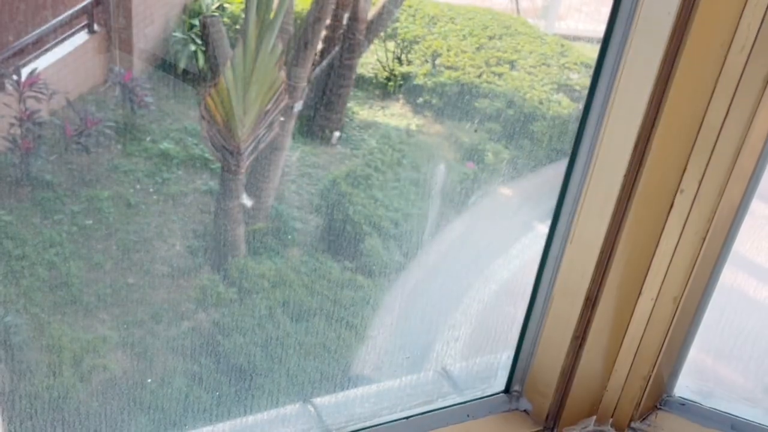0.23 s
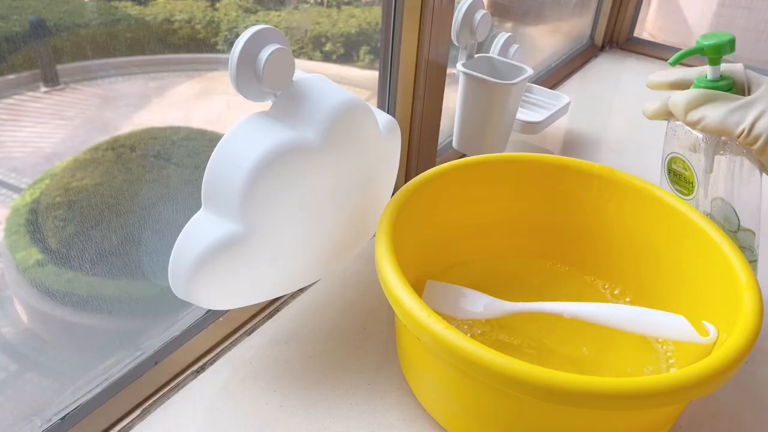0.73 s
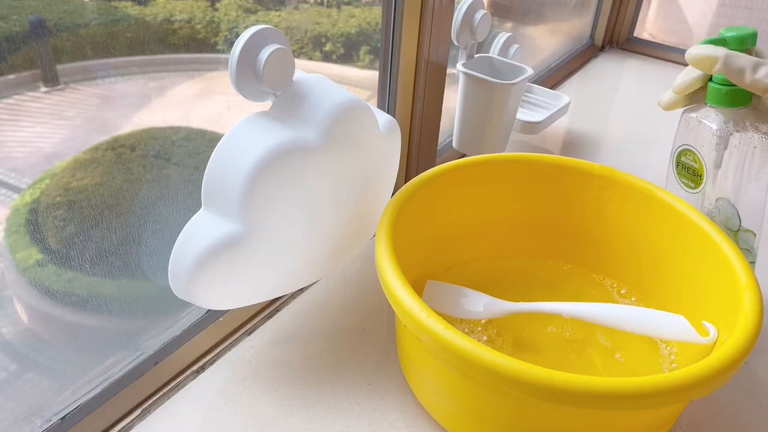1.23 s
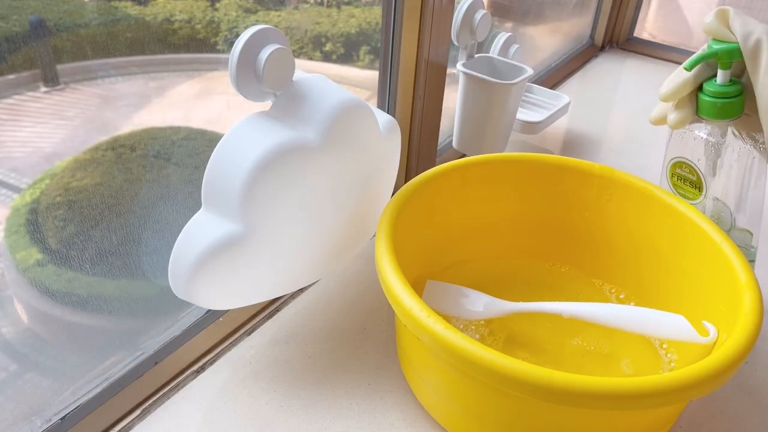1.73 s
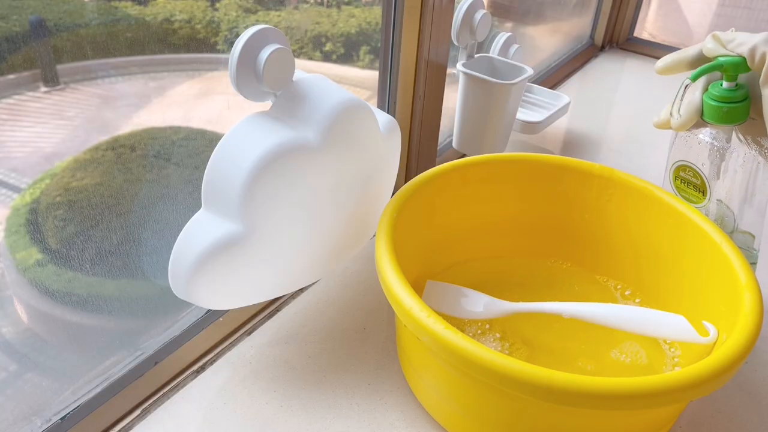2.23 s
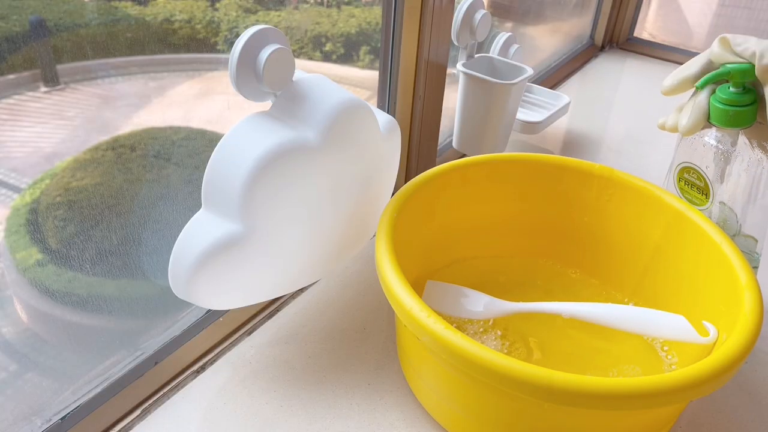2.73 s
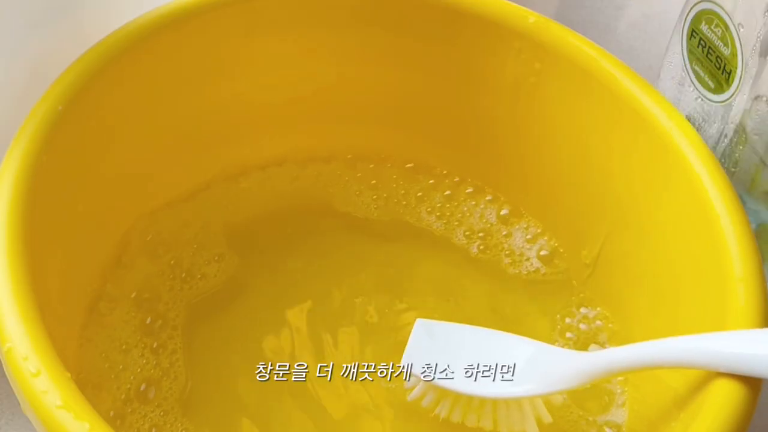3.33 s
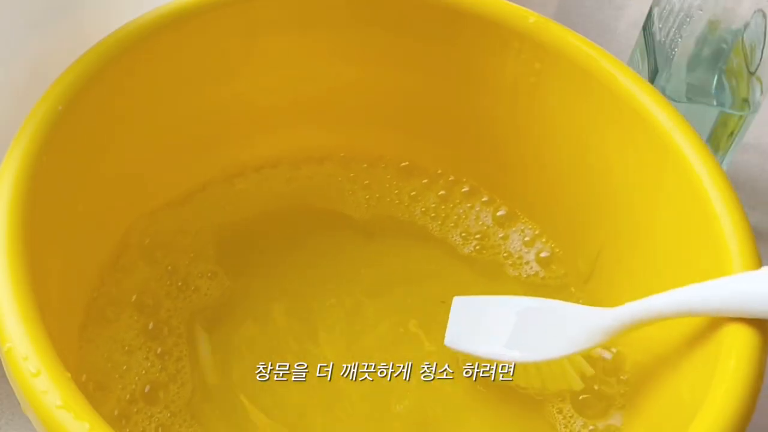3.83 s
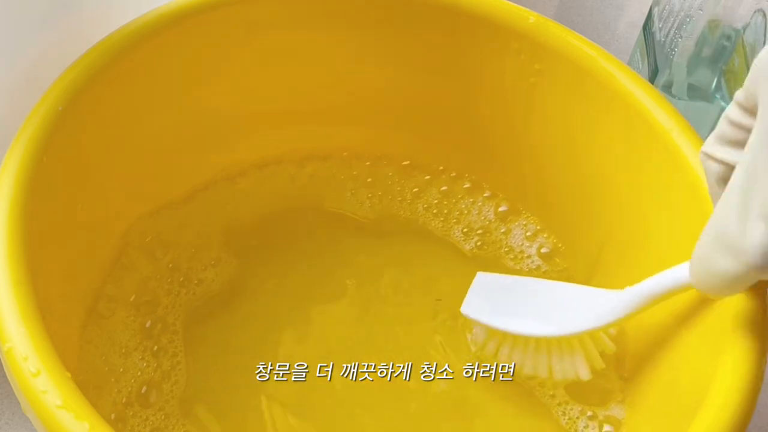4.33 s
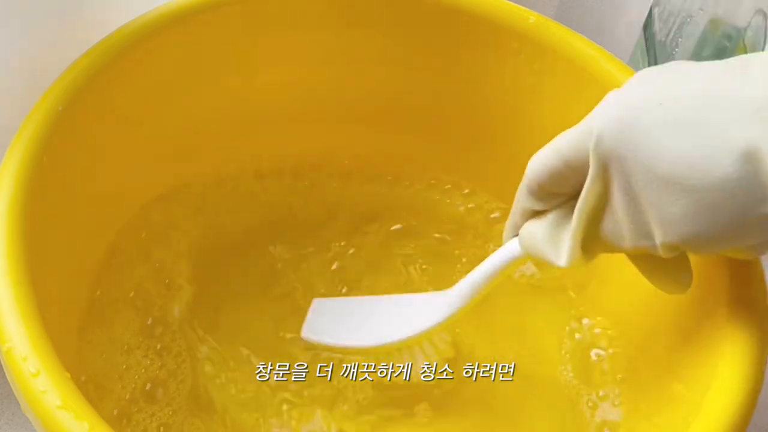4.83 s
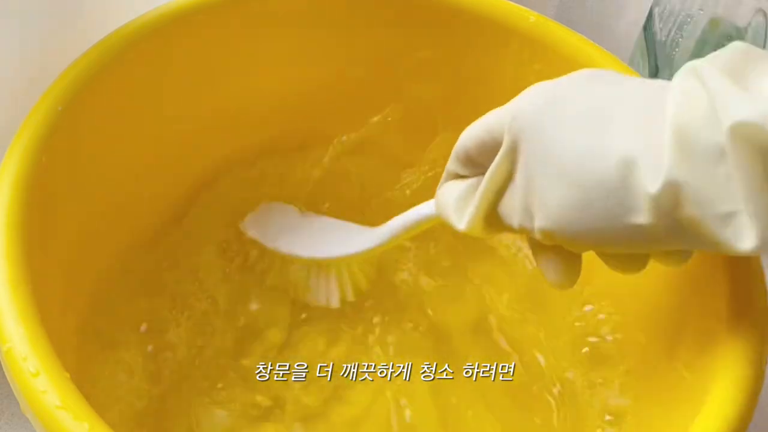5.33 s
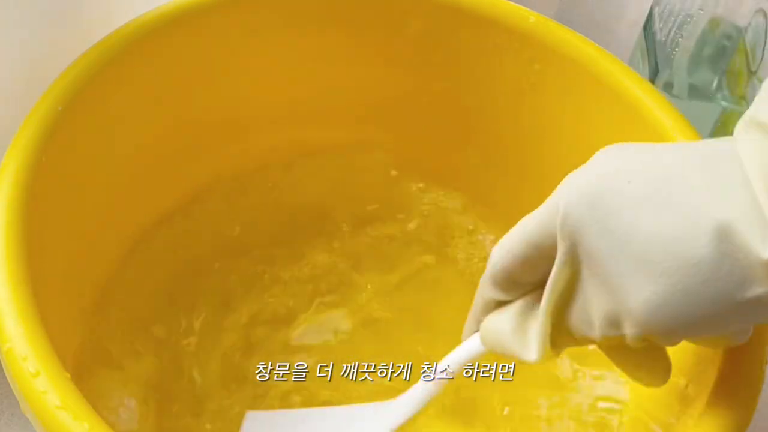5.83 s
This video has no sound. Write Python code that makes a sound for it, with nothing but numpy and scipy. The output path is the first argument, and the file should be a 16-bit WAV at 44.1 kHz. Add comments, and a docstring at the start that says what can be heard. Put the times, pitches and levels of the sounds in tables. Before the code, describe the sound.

Low humming room, one resonant double thud, bottle knocks and glove rustle, a short dull slide, then bubbly stirring and small splashes in a tub.

```python
"""A mains hum and low rumble fill a quiet room by a window, under the rustle of a gloved hand.
A window frame thuds shut in ringing modes; a pump bottle is worked, slid over the sill and set down, in
hollow knocks, clicks, rubs and resonant scraping. A brush is lifted and stirs soapy water in a plastic
basin, made of chirping bubbles and short pitched rings. Echoes die by frequency, and the two microphone
ports turn against each other in phase in the treble."""
import sys
import numpy as np
from scipy import signal
from scipy.fft import rfft, irfft, next_fast_len
from scipy.io import wavfile
from scipy.ndimage import uniform_filter1d, map_coordinates

SR = 44100
rng = np.random.default_rng(int(sys.argv[2]) if len(sys.argv) > 2 else 0)


def wav_record(signal):
    """Record a signal, one row per channel, as 16-bit PCM in the file named by sys.argv[1]."""
    frames = np.transpose(np.atleast_2d(signal))
    bounded = np.clip(frames, -1, 1)
    # unit amplitude maps onto the largest positive 16-bit level
    quanta = np.round(bounded * 32767).astype(np.int16)
    wavfile.write(sys.argv[1], SR, quanta)


N = 268083


def amp(db):
    """Decibels to linear gain."""
    return 10 ** (np.asarray(db) / 20)


def unit(x):
    """Scales a sound to rms 1."""
    return x / np.sqrt(np.mean(x ** 2) + 1e-20)


def along(points, hz):
    """Reads (frequency, value) points on a log frequency axis."""
    f, v = np.transpose(points)
    return np.interp(np.log(hz + 1), np.log(f + 1), v)


def curves(rows):
    """One gain per sample for each dB column, at -150 dB outside the rows."""
    s, *cols = np.transpose(rows)
    t = np.arange(N) / SR
    return [amp(np.interp(t, s, col, left=-150, right=-150)) for col in cols]


def ramp(start, length):
    """Climbs from 0 to 1 over length seconds."""
    return np.clip((np.arange(N) / SR - start) / length, 0, 1)


def wobble(rate):
    """A smooth random curve, rate knots a second."""
    knots = rng.standard_normal(int(N * rate / SR) + 4)
    return map_coordinates(knots, [np.arange(N) * rate / SR])


def filtered(x, response):
    """Multiplies the spectrum of x by a complex response of frequency."""
    m = next_fast_len(x.shape[-1] + SR // 4)
    return irfft(rfft(x, m) * response(np.fft.rfftfreq(m, 1 / SR)), m)[..., :x.shape[-1]]


def band(x, lo_hz, hi_hz):
    """Butterworth band-pass."""
    sos = signal.butter(2, [lo_hz, min(hi_hz, SR / 2.2)], "band", fs=SR, output="sos")
    return signal.sosfilt(sos, x)


def add(track, s, sound):
    """Mixes a sound in at s seconds."""
    part = track[round(s * SR):][:len(sound)]
    part += sound[:len(part)]


def ring(hz, t60, attack, rise=0):
    """A damped sine; its pitch climbs by twice the share rise over its t60."""
    t = np.arange(int(SR * t60) + 8) / SR
    wave = np.sin(2 * np.pi * hz * t * (1 + rise * t / t60))
    return wave * amp(-60 * t / t60) * (1 - np.exp(-t / attack))


def bubbles(count, centre_hz, spread, cycles, size_db):
    """Random climbing chirps, summed to rms 1; a few bubbles are much larger than the rest."""
    at, size = rng.random(count), rng.exponential(size_db, count)
    pitch = rng.standard_normal(count)
    hz = np.clip(centre_hz * np.exp(spread * pitch), 150, 15000)[:, None]
    k = np.arange(int(3 * cycles * SR / centre_hz))
    u = k / SR * hz / cycles  # each bubble's own time
    chirp = np.sin(2 * np.pi * cycles * u * (1 + 0.197 * u))
    wave = amp(np.minimum(size, 3 * size_db))[:, None] * chirp * u * np.exp(-3.5 * u)
    start = (N * at).astype(int)[:, None]
    return unit(np.bincount((start + k).ravel(), wave.ravel(), minlength=N)[:N])


# Likeness of left and right in diffuse sound: (frequency [Hz], correlation)
LIKENESS = [(60, 0.98), (250, 0.86), (550, 0.36), (900, 0.19), (1600, 0.27), (2800, 0.55), (4500, 0.095),
            (6200, 0.73), (7300, 0.09), (8600, 1), (12000, 0.93)]


def paired(two):
    """Mixes two unrelated signals to a left and right with the room's likeness."""
    def mid_side(hz):
        turn = np.arccos(np.clip(along(LIKENESS, hz), -1, 1)) / 2
        return np.array([np.cos(turn), np.sin(turn)])

    mid, side = filtered(two, mid_side)
    return np.array([mid + side, mid - side])


def rush(spectrum, patchy_db):
    """Coloured stereo noise of rms 1 with patches of random gain in time and frequency."""
    z = signal.stft(rng.standard_normal((2, N)), nperseg=512)[2]
    field = uniform_filter1d(rng.standard_normal(z.shape[1:]), 6, 0)
    field = uniform_filter1d(field, 8, 1)
    two = signal.istft(z * amp(patchy_db * unit(field)), nperseg=512)[1][:, :N]
    return unit(paired(filtered(two, lambda hz: amp(along(spectrum, hz)))))


# Colour of the low rumble: (frequency [Hz], relative level [dB])
RUMBLE_COLOUR = [(20, -28), (45, -44), (60, -6.5), (78, 1), (95, -9), (120, -7), (150, -15.5), (220, -27.5),
                 (300, -67)]
# Colour of the dull room murmur: (frequency [Hz], relative level [dB])
MURMUR_COLOUR = [(100, -3), (200, 1), (600, -5.5), (1400, -19), (3000, -39), (4500, -39), (9000, -49),
                 (16000, -99)]
# Background swells: (time [s], room murmur level [dB], deep drone level [dB])
BACKGROUND_LEVELS = [(0, -49, -42), (.6, -54, -64), (1, -53.5, -68), (2.8, -53.5, -57), (3.3, -53, -53),
                     (4.6, -53, -58), (5.3, -52, -50), (6.08, -54, -64)]
MAINS_HZ, MOTOR_HZ = 100.6, 78.4
# Hum and rumble share a base level, lower by the early cut until they swell between two times
LOW_DB, LOW_EARLY_DB, LOW_SWELL_S = -36.5, -6.5, (0.15, 0.37)


def air():
    """A steady mains tone and an unsteady motor tone stand on wavering rumble, a deep drone and a murmur."""
    def tone(hz, waver_hz):
        return np.sin(2 * np.pi * np.cumsum(hz + waver_hz * wobble(2.854)) / SR)

    swell_start, swell_end = LOW_SWELL_S
    low = amp(LOW_DB + LOW_EARLY_DB * (1 - ramp(swell_start, swell_end - swell_start)))
    mains = amp(1.5 + 0.072 * wobble(4.5)) * tone(MAINS_HZ, waver_hz=0.27)
    motor = amp(-8.5) * amp(2.5 * wobble(5)) * tone(MOTOR_HZ, waver_hz=1.46)
    rumble = amp(-4) * rush(RUMBLE_COLOUR, patchy_db=1.5)
    murmur, deep = curves(BACKGROUND_LEVELS)
    drone_colour = [(15, -18), (30, -18), (48, 28), (60, -18), (90, -80)]  # Hz, dB
    drone = deep * amp(-1 * wobble(2.86)) * rush(drone_colour, patchy_db=-3.0)
    return drone + low * (mains + motor + rumble) + murmur * rush(MURMUR_COLOUR, patchy_db=2.5)


# Glove, foam and water in motion: (time [s], fizz level [dB], swish level [dB])
RUSTLE_LEVELS = [(0, -64.5, -58.5), (.27, -74, -63), (.49, -105, -69), (.6, -70, -62.5), (.8, -62.5, -63),
                 (.89, -59, -66), (1, -69, -66.5), (1.13, -62.5, -62.5), (1.3, -65, -60.5),
                 (1.39, -78.5, -65.5), (1.55, -59.5, -65.5), (1.64, -76, -69), (1.76, -65, -65),
                 (1.9, -93, -71), (2.05, -71, -66.5), (2.56, -100, -69), (2.71, -65, -65),
                 (2.96, -66.5, -63), (3.17, -55.5, -58.5), (3.35, -73.5, -64.5), (3.67, -61, -68),
                 (4.1, -67, -57), (4.42, -64, -62.5), (4.64, -59, -59.5), (5.1, -54.5, -62),
                 (5.5, -52, -55), (5.62, -59, -51.5), (5.76, -49.5, -66), (5.97, -58, -58.5),
                 (6.08, -53.5, -60)]
# Colour of the bright fizz: (frequency [Hz], relative level [dB])
FIZZ_COLOUR = [(1500, -11), (3500, 4), (6000, -4), (8800, 2), (11500, 2.5), (16000, -3.5)]
# Colour of the softer swish: (frequency [Hz], relative level [dB])
SWISH_COLOUR = [(300, -100), (900, 5.5), (2000, 3.5), (3300, -1.5), (4500, -9.5), (8000, -19.5)]


def rustle():
    """Rubber glove and foam: fizz and swish noises share one flicker."""
    flicker = wobble(35)
    fizz_gain, swish_gain = curves(RUSTLE_LEVELS)
    fizz = amp(0.91 * flicker) * rush(FIZZ_COLOUR, patchy_db=3.5)
    swish = amp(1.8 * flicker) * rush(SWISH_COLOUR, patchy_db=1.3)
    return fizz_gain * fizz + swish_gain * swish


# Faint fuzzy tones from afar: (start [s], end [s], pitch [Hz], level [dB])
FAR_TONES = [(0.02, 0.27, 2790, -67), (0.272, 0.466, 2880, -66), (1.26, 1.4, 3220, -64.5),
             (1.29, 1.46, 3000, -68), (1.317, 1.433, 3700, -66), (1.478, 1.66, 4750, -72),
             (1.685, 1.847, 3560, -65), (1.737, 1.84, 2770, -67), (1.844, 1.956, 2830, -69),
             (1.875, 2.057, 3070, -64), (2.09, 2.2, 3080, -71), (2.172, 2.29, 3100, -71),
             (2.27, 2.42, 3130, -74)]


def whistles():
    """Slow noise times a sine makes a narrow band that swells and fades."""
    out = np.zeros(N)
    for start, end, hz, db in FAR_TONES:
        t = np.arange(round((end - start) * SR)) / SR
        fuzz = unit(uniform_filter1d(rng.standard_normal(SR), 220))[:len(t)]
        swell = np.sin(np.pi * t / (end - start)) ** .5
        add(out, start, amp(db) * swell * fuzz * np.sin(2 * np.pi * hz * t))
    return out


# Knocks on hollow plastic: (time [s], level [dB], pitch [Hz])
HOLLOW_KNOCKS = [(.265, -38.5, 199.6), (1.322, -31, 277), (2.001, -26, 333), (2.651, -45.5, 336),
                 (3.2007, -22, 266.3), (3.492, -37.5, 315), (3.523, -39, 328), (3.549, -40.5, 473),
                 (3.637, -28, 347), (3.642, -35.5, 449), (3.675, -36.5, 297), (4.096, -34, 193),
                 (4.964, -38.5, 188), (5.273, -35.5, 246), (5.358, -43, 222), (5.427, -39, 237),
                 (5.607, -34, 221), (5.661, -35, 260), (5.775, -43.5, 255), (5.822, -37, 224)]
# Modes of each knock, before the underwater shortening: (pitch ratio, relative level [dB], t60 [s], attack [s])
HOLLOW_MODES = [(1, 3, 0.14, 0.004), (0.8, -13, 0.14, 0.007), (1.77, -9, 0.05, 0.002)]
KNOCK_PUFF_DB, KNOCK_PUFF_T60_S = -5, 0.08
GLUG_SHORTER = 0.66  # factor on the decay of knocks under water


def knocks():
    """Each knock has a hollow note, a lower neighbour, a short overtone and a dull puff of noise."""
    out, puffs = np.zeros((2, N))
    t = np.arange(SR // 8) / SR
    for s, db, hz in HOLLOW_KNOCKS:
        shorter = GLUG_SHORTER if s > STIR_LEVELS[0][0] else 1
        for ratio, mode_db, t60, attack in HOLLOW_MODES:
            add(out, s, amp(db + mode_db) * ring(ratio * hz, t60 * shorter, attack))
        decay = amp(db + KNOCK_PUFF_DB - 60 * t / KNOCK_PUFF_T60_S)
        add(puffs, s, decay * rng.standard_normal(len(t)))
    return out + band(band(puffs, 280, 880), 280, 880)


# Dull, middle and bright bands of a burst: (low edge [Hz], high edge [Hz], gain on white noise [dB])
BURST_SPLIT = [(455, 1700, 8.5), (1570, 5570, 5), (7910, 17800, 7)]


def foam():
    """Large, middling and tiny bubbles, each as strong as white noise is in its band."""
    large = bubbles(count=1500, centre_hz=1050, spread=0.311, cycles=6.3, size_db=4.5)
    middling = bubbles(count=4000, centre_hz=3000, spread=0.305, cycles=9.0, size_db=3.5)
    tiny = bubbles(count=9000, centre_hz=10260, spread=0.312, cycles=13.0, size_db=10.0)
    share = [[2 * (hi - lo) / SR] for lo, hi, _ in BURST_SPLIT]
    return np.array([large, middling, tiny]) * np.sqrt(share)


def bursts(rows, head, attack, t60, crack, grain_db, stagger=0):
    """Three band envelopes, tilted row by row; crack is the share of a very short start.
    A row's level is the rms of its first head seconds; bands may start up to stagger seconds late."""
    parts, t = np.zeros((3, N)), np.arange(SR // 5) / SR
    decay = crack * amp(-60 * t / 0.0085) + amp(-60 * t / t60)
    shape = decay * (1 - np.exp(-t / attack)) ** 2
    shape = shape / np.sqrt(np.mean(shape[:round(head * SR)] ** 2))
    for s, db, tilt_db in rows:
        for part, level in zip(parts, (db - tilt_db, db, db + tilt_db)):
            # overlapping bursts add in power
            add(part, s - attack + stagger * rng.random(), (amp(level) * shape) ** 2)
    return np.sqrt(parts) * amp(grain_db * wobble(260))


# Sharp clicks, contacts and bursting drops, before band gains: (time [s], level [dB], bright over middle [dB])
SHARP_CLICKS = [(0.2889, -58.5, -8), (0.4581, -36, -6.5), (0.7083, -48, -2), (1.321, -63.5, -15),
                (1.995, -39.5, -2), (2.1, -73, 11), (2.157, -69.5, 6), (2.265, -76, 12), (2.4441, -58, 1),
                (2.4525, -53, 2.5), (2.646, -63.5, -14), (2.6646, -71.5, 12), (2.743, -77, 18),
                (2.7765, -46, 1.5), (2.792, -63, -10), (2.8457, -51, 3), (2.922, -56, -3),
                (2.9388, -55, -5), (3.1267, -49.5, 2), (3.164, -51, 5), (3.1885, -69, 4), (3.2145, -67, 8),
                (3.227, -64, -8), (3.232, -55.5, -9), (3.274, -58, -3), (3.305, -59.5, 0),
                (3.636, -58, -17), (3.8391, -44.5, -0.5), (4.222, -80, -24), (4.3, -76, -32),
                (4.366, -58, -13), (4.3825, -54, -15.5), (4.5873, -45, -5.5), (5.242, -64, 17.5),
                (5.3028, -50.5, 10.5), (5.3177, -44, 0.5), (5.6426, -40, 0.5), (5.781, -44, 5.5),
                (5.858, -52, 4), (5.904, -51, 6), (6.054, -48, 6.5)]
# Soft rubs and splashes, before band gains: (time [s], level [dB], bright over middle [dB])
SOFT_PUFFS = [(0.481, -53.5, -14), (0.6619, -62, -4.5), (1.113, -65, 2), (1.4913, -70, 1), (1.552, -68, -4),
              (1.7344, -67.5, 0), (2.9706, -66, -7), (3.13, -57, -2), (3.1524, -51.5, -1.5),
              (3.817, -64, -8), (3.9836, -68.5, 5), (4.0231, -62.5, -10.5), (4.529, -65.5, 4),
              (4.827, -63.5, 5.5), (4.8872, -72, -11), (4.9586, -55, -3), (4.9989, -51.5, -5.5),
              (5.086, -75, 11), (5.1595, -53, 1.5), (5.1772, -51, -2), (5.1964, -55, 11.5),
              (5.3764, -74, 0.3), (5.4355, -62, 3), (5.474, -61, 3), (5.486, -53, 4), (5.5152, -50.5, -0.5),
              (5.535, -55, 2), (5.5587, -61, 4), (5.6904, -63.5, 19), (5.7168, -70, 3), (5.7478, -57, 15.5)]
DROP_ATTACK_S, DROP_STAGGER_S = .0018, .0045
GRAINY = .85  # power share of bubbles in the soft bursts; the rest is noise


def clicks_and_splashes():
    """Dry clicks start sharply, drops in stirred water slower and ragged; puffs swell in, full of bubbles."""
    wet_from_s = STIR_LEVELS[1][0]
    dry_rows = [row for row in SHARP_CLICKS if row[0] <= wet_from_s]
    wet_rows = [row for row in SHARP_CLICKS if row[0] > wet_from_s]
    clicks = bursts(dry_rows, head=0.0052, attack=0.00082, t60=0.043, crack=5.9, grain_db=0.9)
    drops = bursts(wet_rows, head=0.0039, attack=DROP_ATTACK_S, t60=0.019, crack=0.95, grain_db=2.5,
                   stagger=DROP_STAGGER_S)
    puffs = bursts(SOFT_PUFFS, head=0.021, attack=0.009, t60=0.085, crack=0, grain_db=3,
                   stagger=2 * DROP_STAGGER_S)
    noise = rng.standard_normal((3, 3, N))
    grains = np.sqrt(GRAINY) * foam() + np.sqrt(1 - GRAINY) * noise[2]
    mix = clicks * noise[0] + drops * noise[1] + puffs * grains
    return sum(amp(db) * band(part, lo, hi) for part, (lo, hi, db) in zip(mix, BURST_SPLIT))


# Breathy rubs and sloshes: (time [s], length [s], level [dB], centre pitch [Hz])
BREATHY_RUBS = [(1.989, 0.042, -43, 950), (4.583, 0.028, -57, 1890), (4.954, 0.022, -52.5, 3300),
                (5.004, 0.04, -60, 2800), (0.411, 0.061, -55, 3000), (4.43, 0.078, -56, 1140),
                (4.685, 0.045, -58, 950), (4.66, 0.04, -69, 1900), (5.167, 0.026, -49, 650),
                (5.66, 0.036, -52, 1200), (1.144, 0.034, -53.5, 1750), (1.174, 0.013, -55, 1840),
                (1.206, 0.015, -51.5, 1020), (1.219, 0.044, -51.5, 1230), (1.238, 0.0079, -54, 1180),
                (1.323, 0.04, -67, 1390), (3.115, 0.024, -53, 1900), (3.16, 0.02, -52, 1890),
                (3.708, 0.018, -55, 2240), (3.761, 0.046, -49.5, 1440), (3.809, 0.033, -47.5, 1490),
                (3.812, 0.0099, -49, 8200), (4.423, 0.085, -53, 1800), (4.583, 0.063, -52, 1300),
                (4.662, 0.044, -54, 1090), (4.812, 0.054, -50.5, 3180), (4.604, 0.029, -55, 686),
                (4.595, 0.059, -75, 2300), (5.37, 0.022, -51, 3000), (5.512, 0.026, -49.5, 3200)]
RUB_WIDTH = 1.4  # ratio of the band edges to the pitch, over and under


def rubs():
    """Each rub is a swell of noise round its own pitch."""
    out = np.zeros(N)
    for s, length, db, hz in BREATHY_RUBS:
        noise = unit(band(rng.standard_normal(SR // 8), hz / RUB_WIDTH, hz * RUB_WIDTH))
        noise = noise[-round(length * SR):]
        add(out, s, amp(db) * np.hanning(len(noise)) * noise)
    return out


# Blow and rebound of the window: (time [s], level [dB])
BLOWS = [(.462, -10.5), (.4936, -17)]
# Modes of the window frame: (frequency [Hz], relative level [dB], t60 [s])
FRAME_MODES = [(68, -12.5, 0.35), (110.5, -3, 0.27), (154, -2.5, 0.2), (238, -32, 0.089), (281, 0, .135),
               (316, .5, .13), (342, 1, .05), (388, -5, .09), (432, -13, 0.38), (465.5, -2.5, 0.17),
               (547.4, -6.5, 0.23), (618, -16, 0.46), (740, -17, 0.17), (824, -10.5, 0.073),
               (950, -18.5, 0.1), (1280, -28, 0.12), (1630, -34, 0.14)]
LOW_MODES_LATE_S = 0.0093  # modes under 200 Hz answer this much later
PORT_LAG_S = 0.00032  # between the ports, for modes over 400 Hz
RATTLE_DB, RATTLE_T60_S = -13, 0.3  # loose noise of the frame under each blow


def thud():
    """The frame rings in all its modes and rattles; upper modes reach left or right first, by turns."""
    out = np.zeros((2, N))
    for k, (hz, db, t60) in enumerate(FRAME_MODES):
        lag = (-1) ** k * PORT_LAG_S * (hz > 400)
        late = LOW_MODES_LATE_S * (hz < 200)
        for s, blow_db in BLOWS:
            sound = amp(blow_db + db) * ring(hz, t60, attack=0.003 * (300 / hz) ** 1.5)
            add(out[0], s + late + lag / 2, sound)
            add(out[1], s + late - lag / 2, sound)
    shake, t = np.zeros(N), np.arange(SR // 4) / SR
    for s, blow_db in BLOWS:
        decay = amp(blow_db + RATTLE_DB - 60 * t / RATTLE_T60_S)
        add(shake, s, decay * np.minimum(t / 0.0081, 1))
    rattle_colour = [(150, -32), (260, 9), (600, -0.5), (1200, -17), (3000, -39.0)]  # Hz, dB
    return out + shake * rush(rattle_colour, patchy_db=5.5)


# Short pitched rings and bubbles: (time [s], level [dB], pitch [Hz])
PITCHED_PLOPS = [(2.099, -45, 8200), (2.156, -34, 8650), (2.157, -44, 1950), (2.45, -22, 11210),
                 (2.46, -38, 2120), (2.7765, -21.5, 11480), (2.776, -35, 7600), (2.845, -36.5, 1940),
                 (2.845, -32.5, 4450), (2.937, -38.5, 1860), (3.152, -41, 8160), (3.156, -35, 1840),
                 (3.16, -30.5, 3640), (3.166, -35, 8700), (3.231, -33.5, 3670), (3.304, -40, 2170),
                 (3.788, -38, 1080), (3.838, -26, 2070), (3.838, -30, 8450), (3.838, -33.5, 1150),
                 (4.223, -35, 1440), (4.302, -31, 897), (4.301, -39, 1720), (4.383, -29, 910),
                 (4.381, -33, 2237), (4.59, -26.5, 1283), (4.587, -30.5, 2200), (4.596, -35, 1340),
                 (4.607, -40, 1270), (4.606, -43, 700), (4.622, -44, 1410), (4.529, -42, 2200),
                 (4.664, -44, 1260), (4.671, -43, 990), (4.684, -61, 1050), (4.705, -46, 970),
                 (4.771, -42.5, 3610), (4.888, -46, 1200), (4.833, -49, 3650), (4.843, -42, 3500),
                 (4.844, -50, 2920), (4.967, -49, 950), (5.005, -36.5, 900), (5.008, -44, 2830),
                 (5.166, -37, 4240), (5.175, -36, 3420), (5.177, -46, 867), (5.196, -51, 8600),
                 (5.218, -63, 1290), (5.234, -61, 2470), (5.241, -57, 8100), (5.298, -40, 2110),
                 (5.303, -29, 11000), (5.305, -63, 2750), (5.321, -56, 980), (5.199, -33.5, 4300),
                 (5.201, -36.5, 2740), (5.208, -36, 1210), (5.304, -31, 950), (5.316, -28, 2770),
                 (5.333, -59, 920), (5.378, -40, 2590), (5.421, -41, 1670), (5.44, -46, 950),
                 (5.516, -46, 2960), (5.519, -45, 4150), (5.527, -36, 1080), (5.537, -40, 1144),
                 (5.546, -43, 1700), (5.559, -36.5, 2200), (5.612, -44, 2400), (5.646, -33, 3420),
                 (5.676, -52, 2110), (5.692, -46, 8500), (5.717, -55, 11200), (5.747, -37.5, 5200),
                 (5.747, -51, 3240), (5.753, -63, 11400), (5.762, -62, 6140), (5.778, -59, 11000),
                 (5.78, -37, 3930), (5.818, -44, 2000), (5.6, -46, 880), (5.643, -34, 2710),
                 (5.663, -32.5, 950), (5.681, -46, 880), (5.753, -31.5, 5970), (5.783, -38, 2850),
                 (5.728, -50, 2660), (5.79, -58, 950), (5.806, -50, 1240), (5.937, -45, 2200),
                 (6.013, -47, 1125), (6.045, -44.5, 2730), (5.906, -41.5, 1770)]
# Decay at 1 kHz of bubbles and of taps before the stirring; higher rings die sooner by this power
PLOP_T60_S, TAP_T60_S, SHORTER_POWER = 0.04, 0.024, 0.33


def plops():
    """Pitched rings that climb a little, as a bubble does near the surface."""
    out = np.zeros(N)
    for s, db, hz in PITCHED_PLOPS:
        t60_at_1k = PLOP_T60_S if s > STIR_LEVELS[0][0] else TAP_T60_S
        t60 = t60_at_1k * (1000 / hz) ** SHORTER_POWER
        add(out, s, amp(db) * ring(hz, t60, attack=0.0012, rise=0.07))
    return out


# Resonances of the sill, before their shift: (frequency [Hz], width [Hz], relative level [dB])
SILL_MODES = [(324, 46, -11), (503, 83, -4.5), (694, 40, -3), (857, 54, -4), (990, 39, -5),
              (1300, 186, -10), (1670, 350, -12.5)]
SLIDE_S, SLIDE_DB, SLIDE_RUMBLE_DB = 3.374, -45.5, -9  # rumble relative to the scrape
SLIDE_ATTACK_S, SLIDE_HOLD_S, SLIDE_RELEASE_S = 0.15, 0.097, 0.17
SLIDE_CLIMB = 1.02  # cross-fades from resonances this factor under to this factor over


def slide():
    """Uneven slips of the bottle's foot excite the sill's resonances over a dull rumble."""
    def sill(f):
        return sum((-1) ** k * amp(db) * 1j * f * w / (c * c - f * f + 1j * f * w)
                   for k, (c, w, db) in enumerate(SILL_MODES))

    slips = rng.standard_normal(N) * amp(2.5 * wobble(140))
    lower = filtered(slips, lambda f: sill(f * SLIDE_CLIMB))
    upper = filtered(slips, lambda f: sill(f / SLIDE_CLIMB))
    moved = ramp(SLIDE_S, SLIDE_ATTACK_S + SLIDE_HOLD_S + SLIDE_RELEASE_S / 2)
    scrape = (1 - moved) * lower + moved * upper
    release = 1 - ramp(SLIDE_S + SLIDE_ATTACK_S + SLIDE_HOLD_S, SLIDE_RELEASE_S)
    push = ramp(SLIDE_S, SLIDE_ATTACK_S) * release ** 2
    rumble = amp(SLIDE_RUMBLE_DB) * unit(band(slips, 130, 460))
    return amp(SLIDE_DB) * push * (unit(scrape) + rumble)


# Moving water: (time [s], gurgle level [dB], spray level [dB])
STIR_LEVELS = [(4.55, -58, -108), (4.71, -80, -67), (5.086, -63.5, -76), (5.256, -100, -58.5),
               (5.362, -90, -59), (5.494, -74, -61), (5.702, -96, -60), (5.848, -76, -60.5),
               (6.079, -80, -69)]
SWARM_DB, SWARM_T60_S = -22, .2  # relative to its plop


def water():
    """The brush throws up gurgles, small bubbles and spray; each plop in the basin leaves a bubble swarm."""
    low, high = curves(STIR_LEVELS)
    swarm, t = np.zeros(N), np.arange(SR // 5) / SR
    for s, db, hz in PITCHED_PLOPS:
        if s > STIR_LEVELS[0][0]:
            add(swarm, s, amp(db + SWARM_DB - 60 * t / SWARM_T60_S))
    gurgle = bubbles(count=2500, centre_hz=1150, spread=0.4, cycles=8, size_db=4)
    small = bubbles(count=4000, centre_hz=2843, spread=0.452, cycles=12, size_db=6)
    spray = bubbles(count=6000, centre_hz=7000, spread=0.4, cycles=16, size_db=4.5)
    small_gain = amp(3) * np.sqrt(low * high) + amp(-4) * swarm
    return (low + swarm) * gurgle + small_gain * small + high * spray


# Decay of the room: (frequency [Hz], t60 [s])
ROOM_DECAY = [(150, 0.48), (1000, 0.17), (4000, 0.18), (11000, 0.14)]


def room(x, hop=SR // 3):
    """Echoes dying by frequency; sources move, so overlapping stretches have their own echo patterns."""
    x, out = np.pad(x, (hop, 2 * hop)), np.zeros((2, N + 2 * SR))
    for start in range(0, N + hop, hop):
        hz, t, z = signal.stft(rng.standard_normal((2, SR // 3)), SR, nperseg=256)
        decay = amp(-60 * t / along(ROOM_DECAY, hz)[:, None])
        tail = signal.istft(z * decay, SR, nperseg=256)[1]
        piece = x[start:start + 2 * hop] * np.sqrt(np.hanning(2 * hop))
        wet = signal.fftconvolve(piece[None], tail / np.linalg.norm(tail[0]), axes=1)
        out[:, start + 150:start + 150 + wet.shape[1]] += wet  # echoes begin 150 samples late
    return paired(out[:, hop:hop + N])


def scene():
    """Sums the direct sounds, their echoes and the background; the whistles are heard only as echoes."""
    near = rubs() + clicks_and_splashes() + water() + slide()
    frame, rings, hollow = thud(), plops(), knocks()
    boom = amp(-17) * frame[0] + amp(-14) * hollow
    wet = room(amp(-4.5) * near + amp(-8.0) * rings + boom + whistles())
    return near + rings + hollow + frame + wet + air() + rustle()


# Phase between the microphone ports: (frequency [Hz], left lead [rad])
PORT_PHASE = [(2000, 0), (3400, 1.3), (4500, .7), (6000, .1), (7000, 0), (7600, .9), (8400, .1),
              (8800, -.3), (10200, -np.pi), (11900, -6.15), (12200, -2 * np.pi)]
# Balance of the ports: (frequency [Hz], left over right [dB])
PORT_BALANCE = [(60, 2.5), (200, 3), (500, 1), (900, 2.5), (2500, 2.5), (4500, 2.5), (6200, 6.5), (7200, 0),
                (8200, 1.5), (12000, -0.5)]
# Overall colour of the sound, falling steeply above 12 kHz: (frequency [Hz], gain [dB])
OVERALL_COLOUR = [(8000, -1.09), (11300, 0.5), (12100, -19.5), (12700, -13), (13300, -43), (16000, -35)]
TOP_HZ = 16600


def record(dry):
    """Overall colour, port balance and phase, then the band limit; each port takes half a difference."""
    def left_and_right(hz):
        left = amp(along(PORT_BALANCE, hz) / 2) * np.exp(1j * along(PORT_PHASE, hz) / 2)
        return amp(along(OVERALL_COLOUR, hz)) * np.array([left, 1 / left])

    return filtered(filtered(dry, left_and_right), lambda hz: hz < TOP_HZ)


dry = scene()
out = record(dry)
wav_record(out)
```